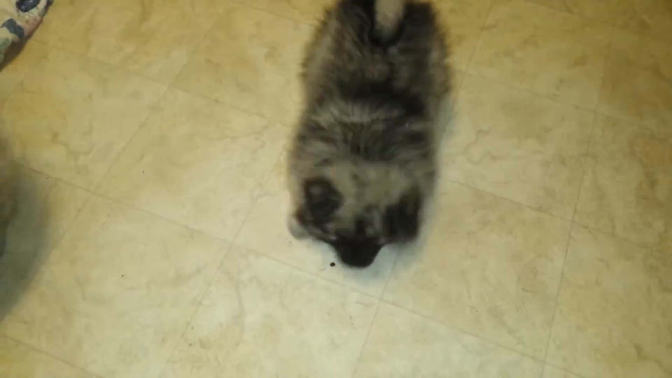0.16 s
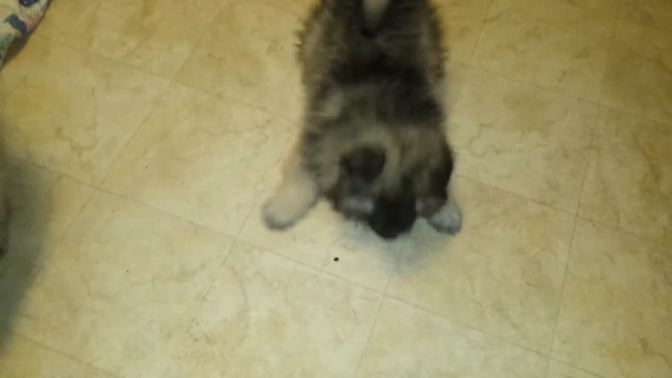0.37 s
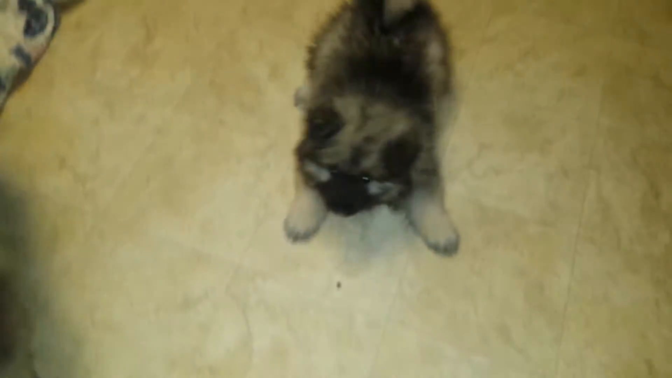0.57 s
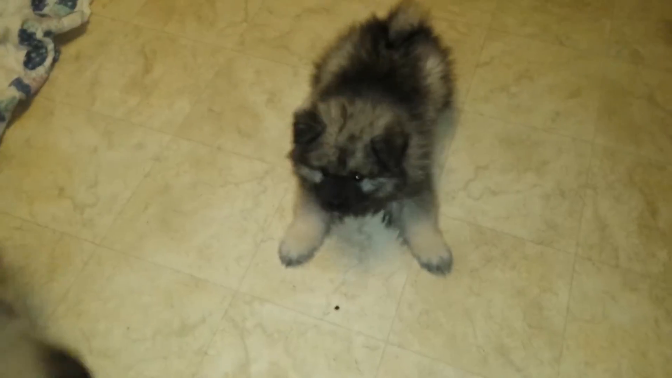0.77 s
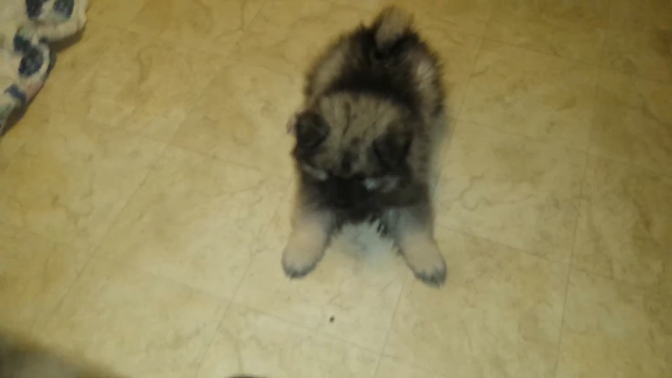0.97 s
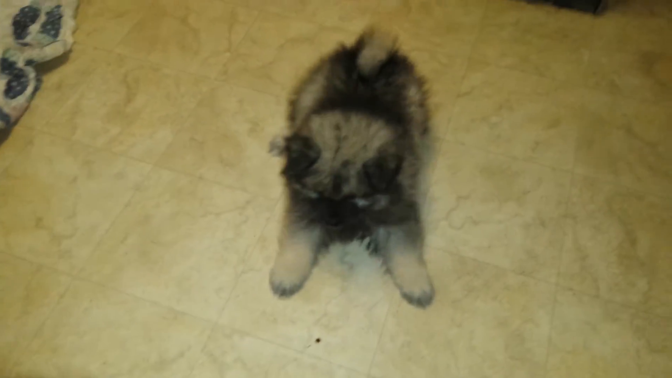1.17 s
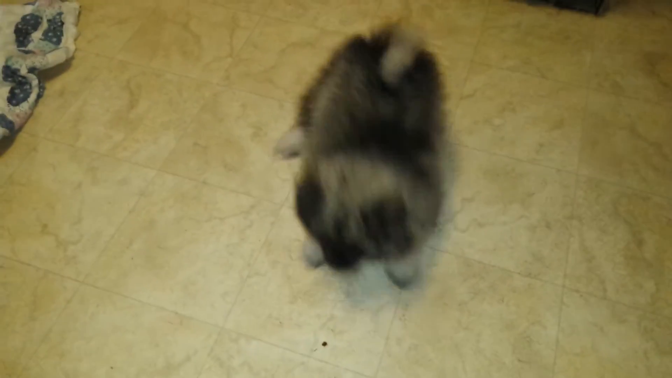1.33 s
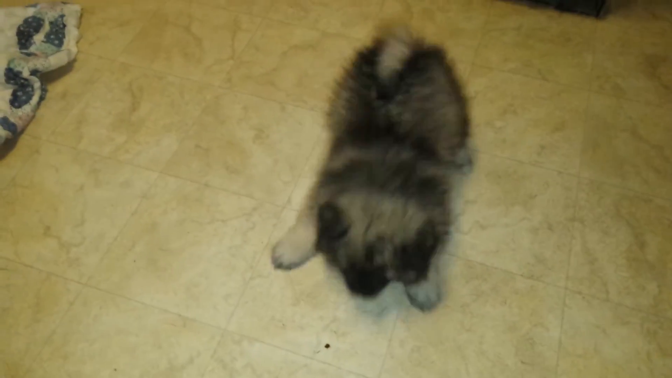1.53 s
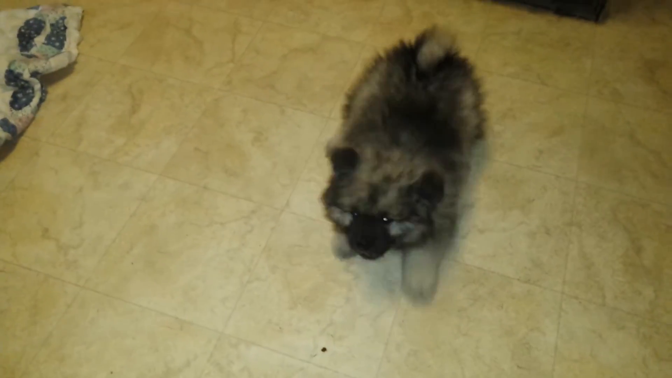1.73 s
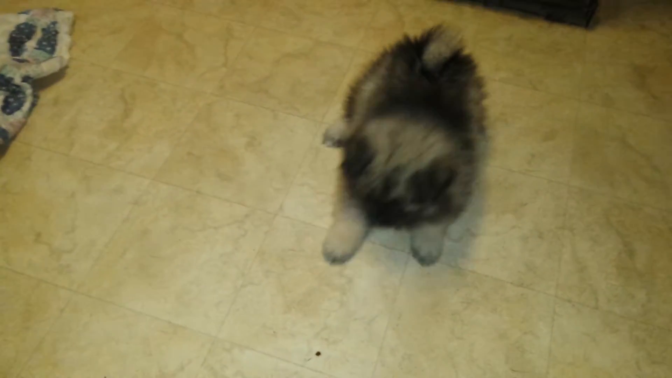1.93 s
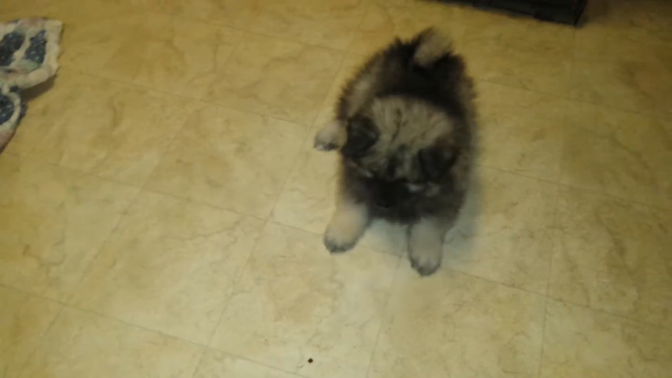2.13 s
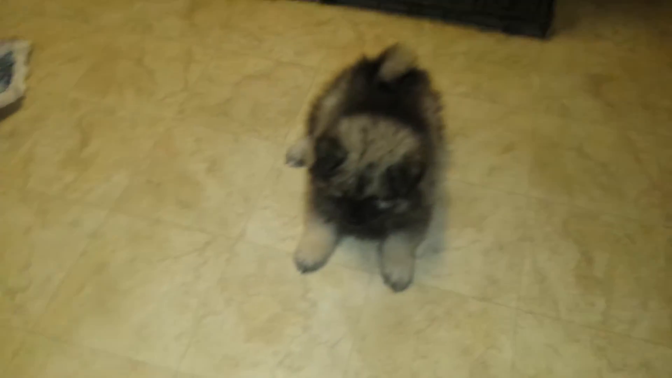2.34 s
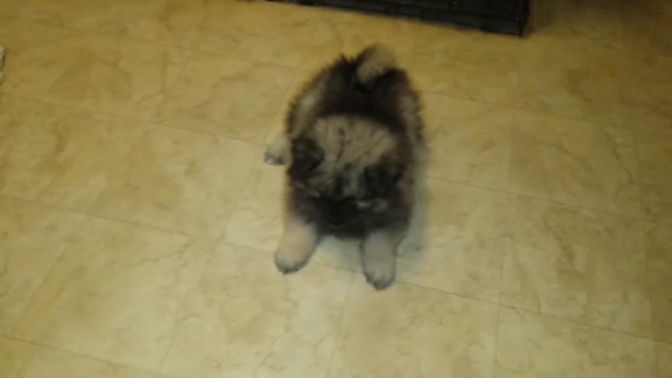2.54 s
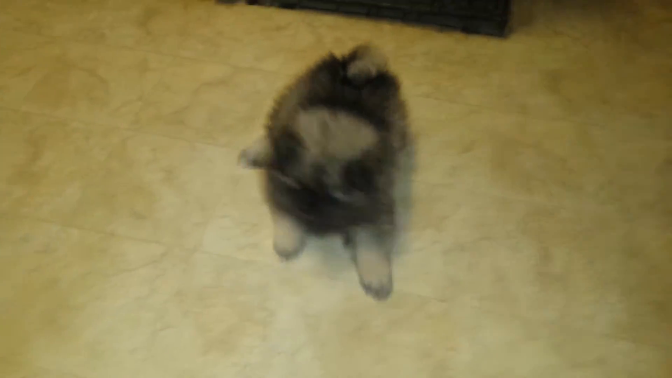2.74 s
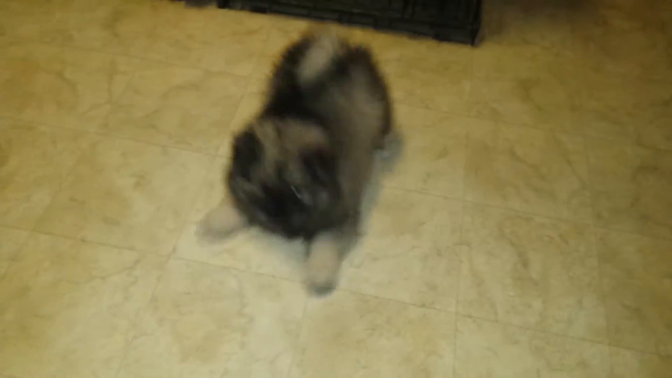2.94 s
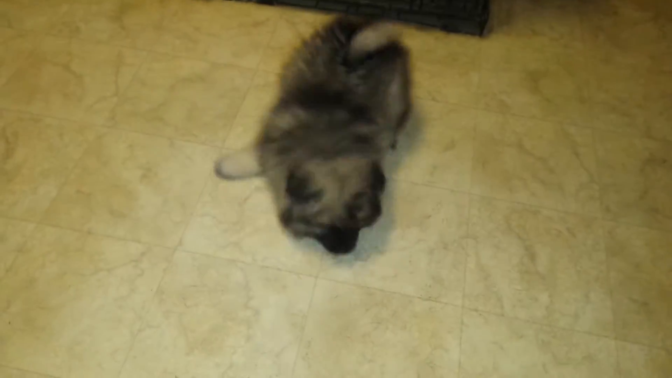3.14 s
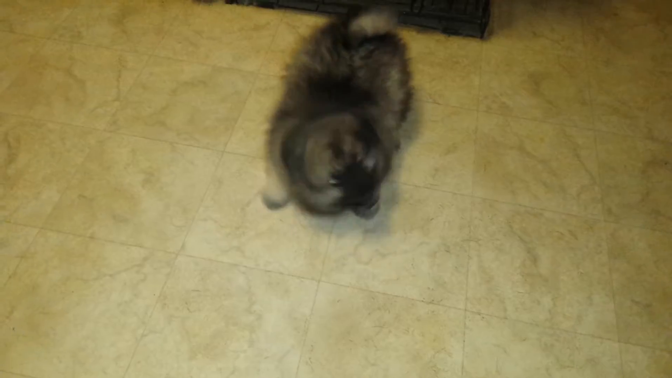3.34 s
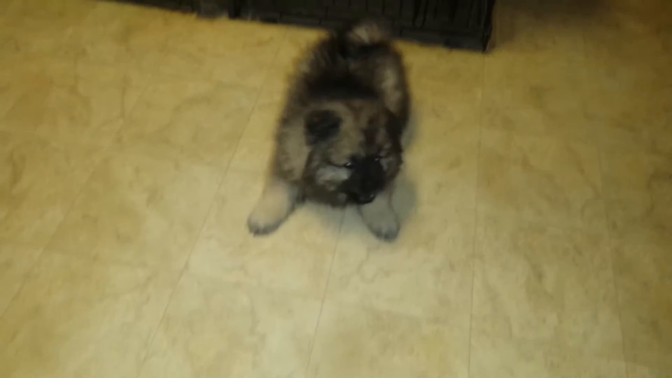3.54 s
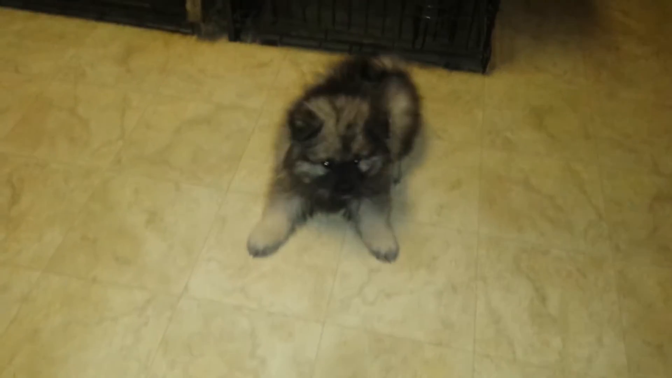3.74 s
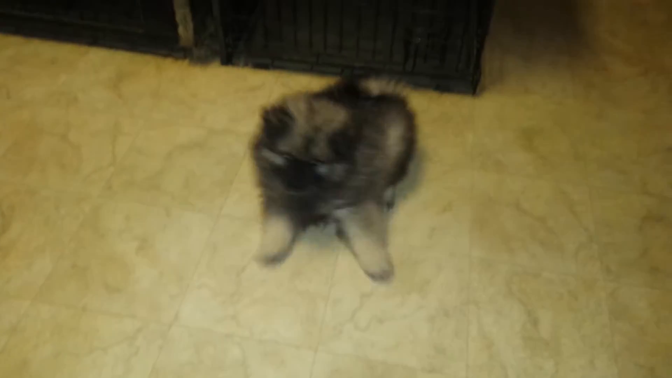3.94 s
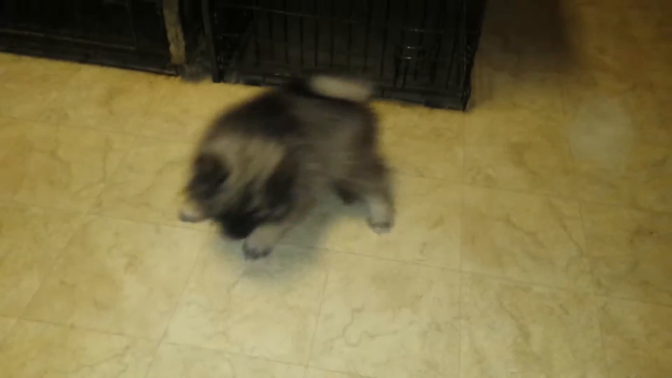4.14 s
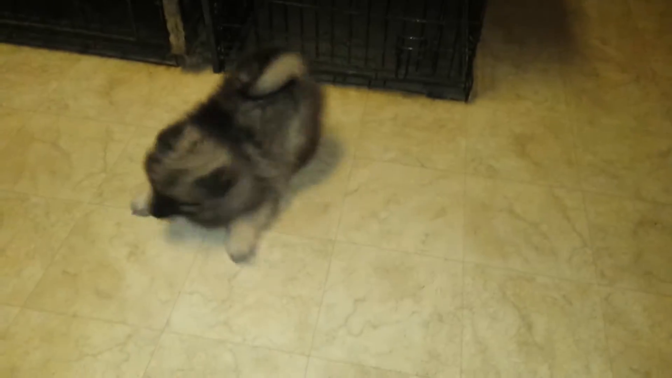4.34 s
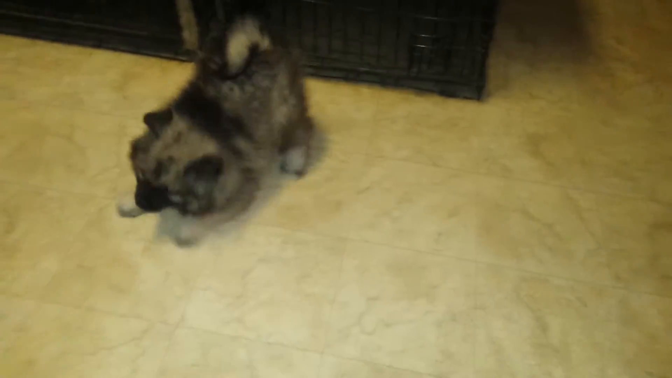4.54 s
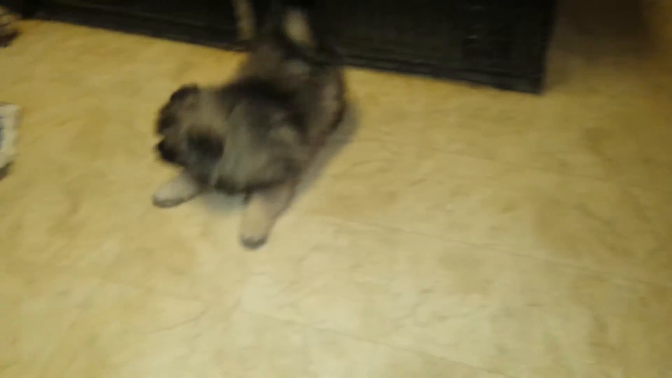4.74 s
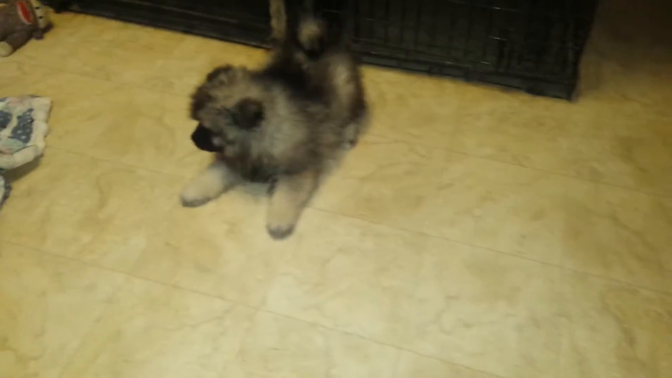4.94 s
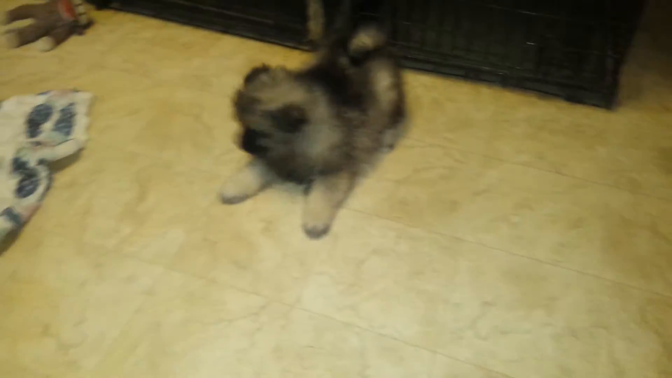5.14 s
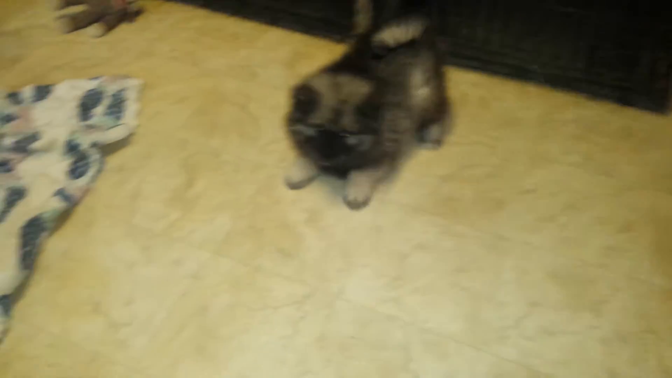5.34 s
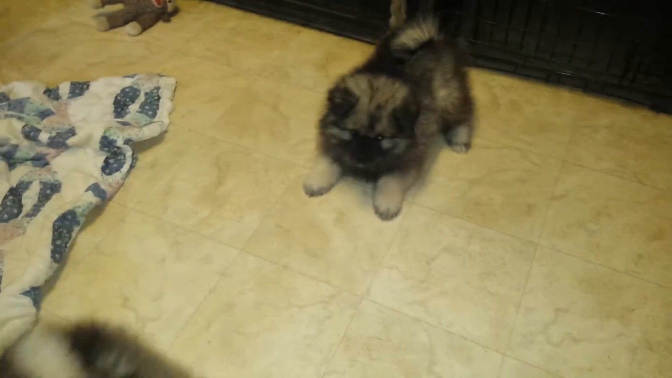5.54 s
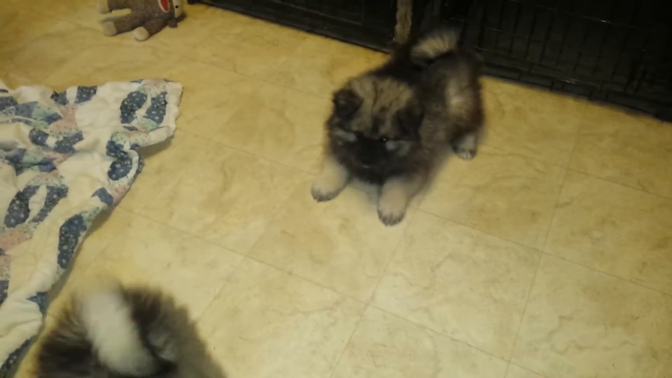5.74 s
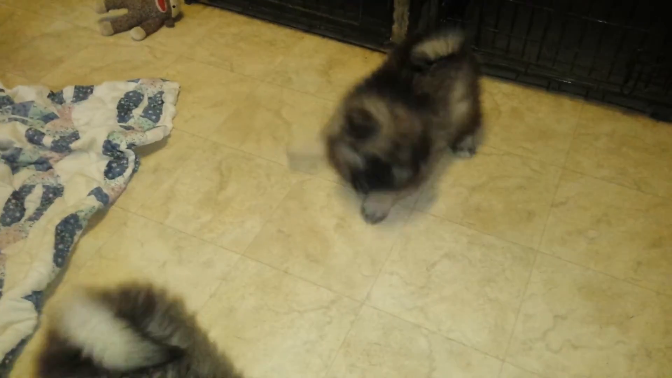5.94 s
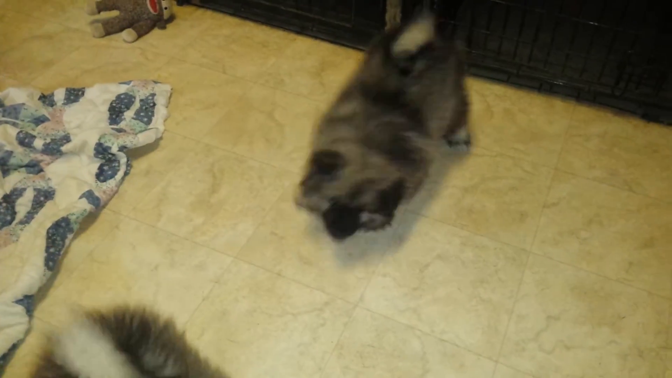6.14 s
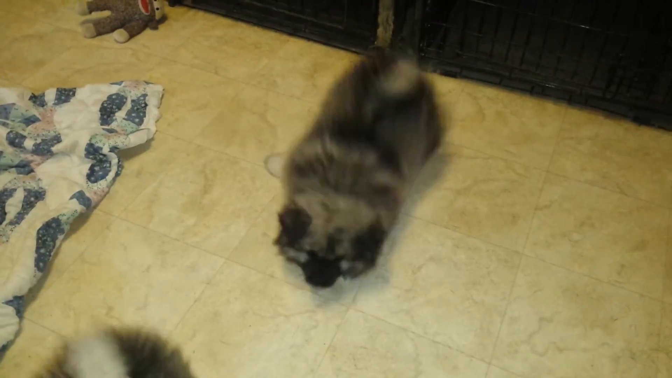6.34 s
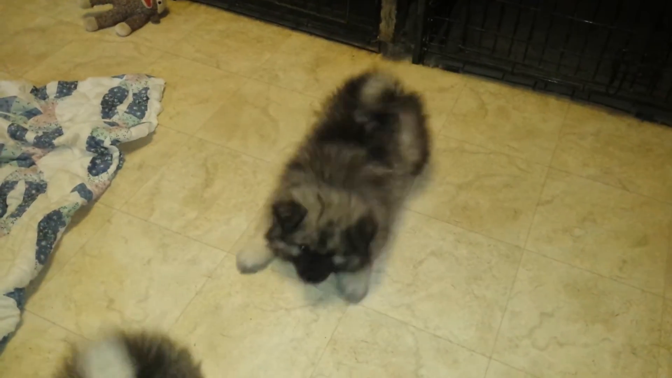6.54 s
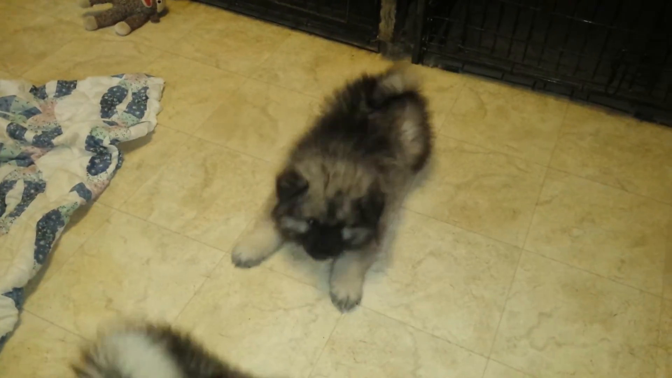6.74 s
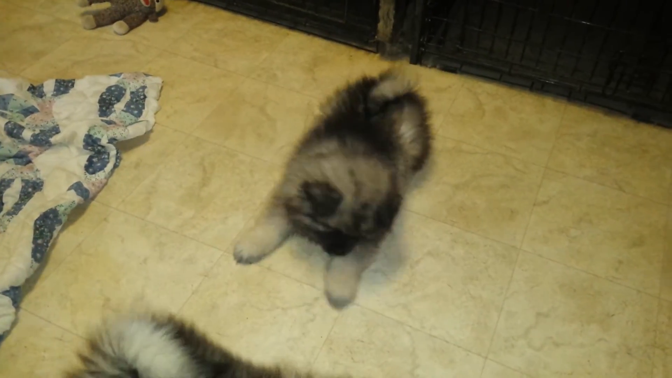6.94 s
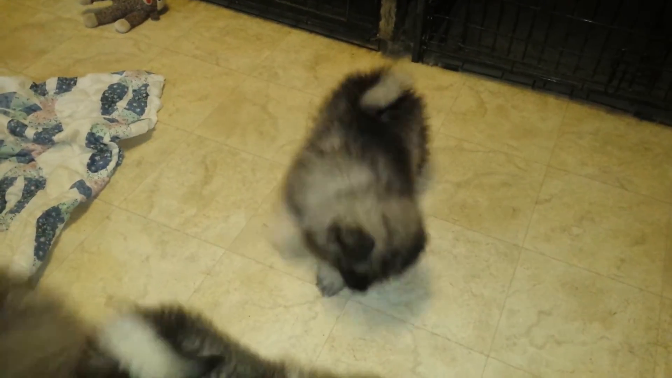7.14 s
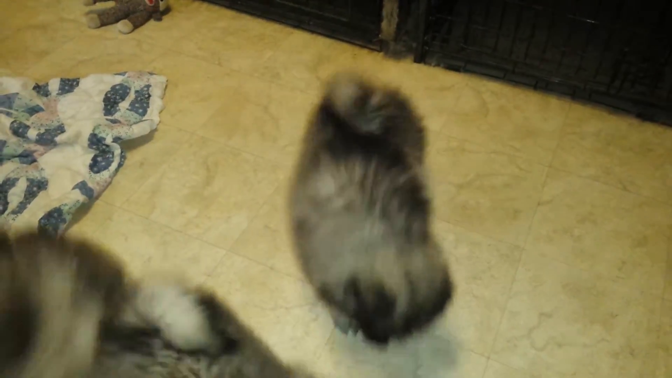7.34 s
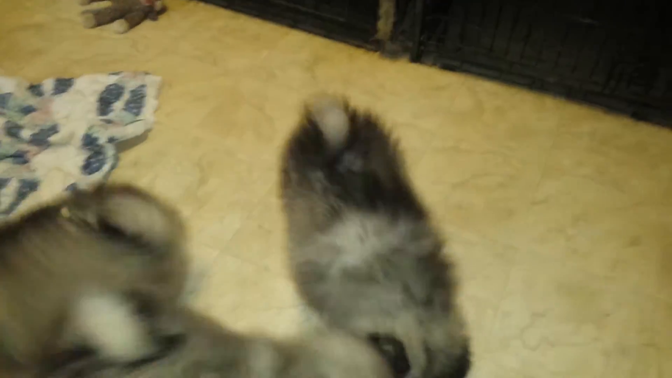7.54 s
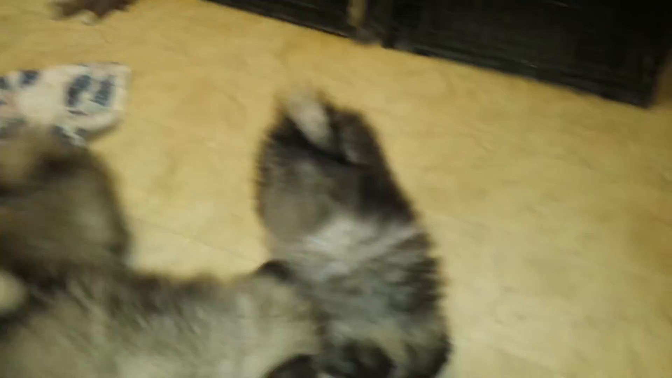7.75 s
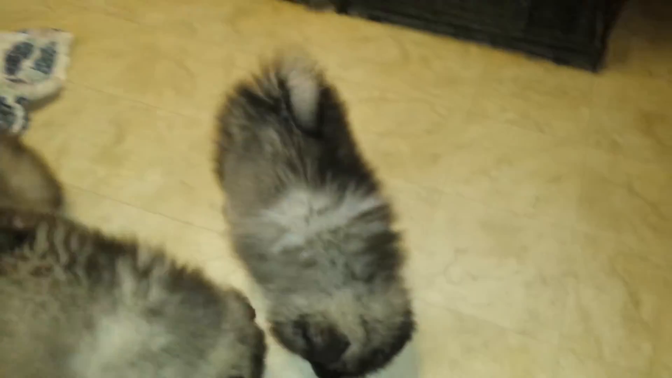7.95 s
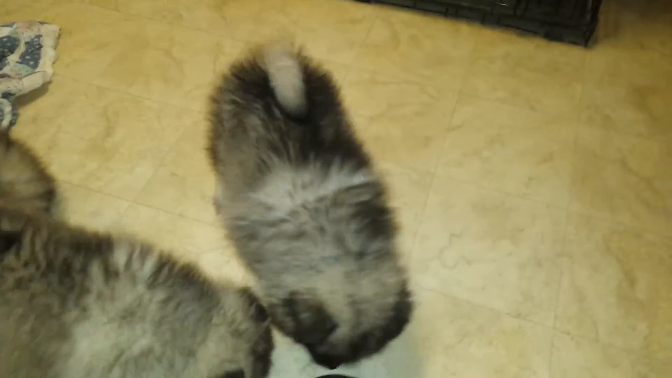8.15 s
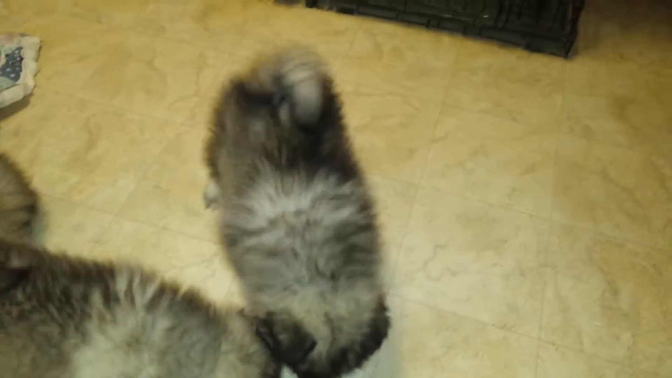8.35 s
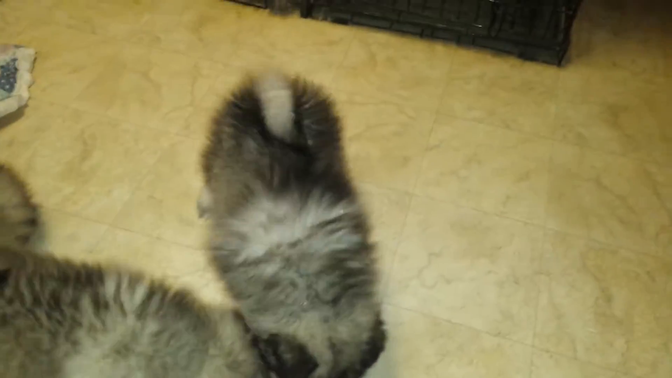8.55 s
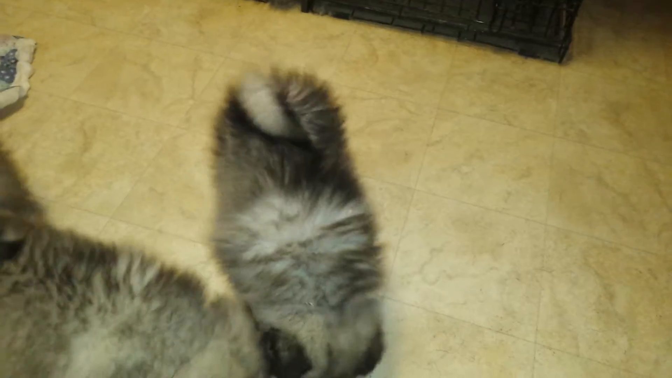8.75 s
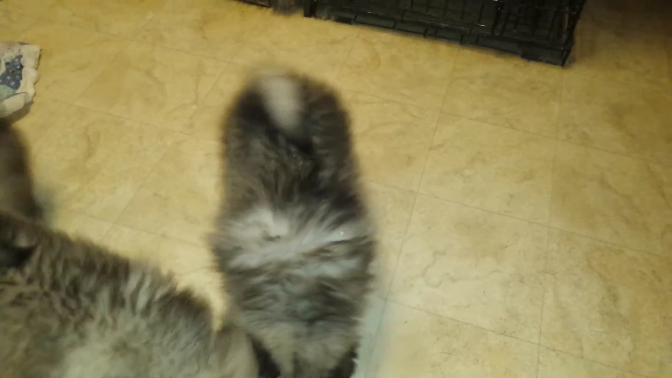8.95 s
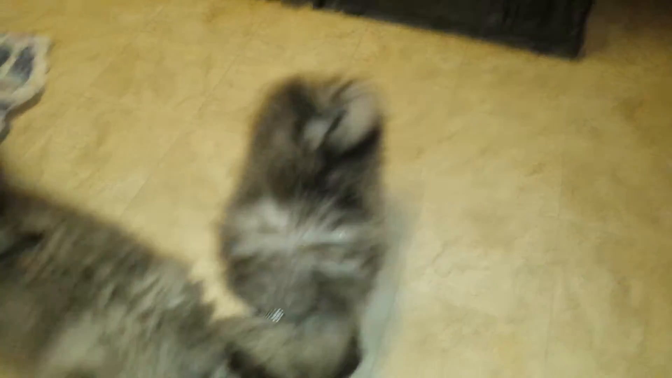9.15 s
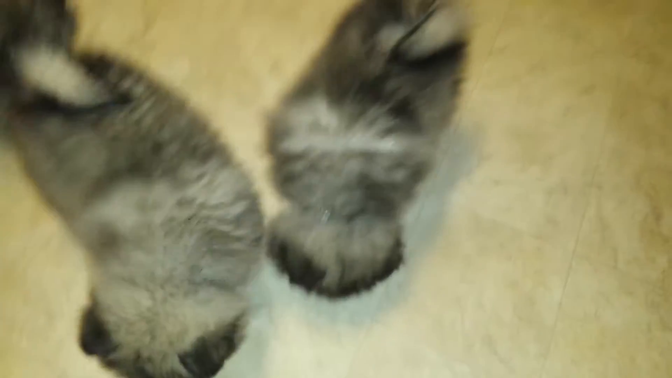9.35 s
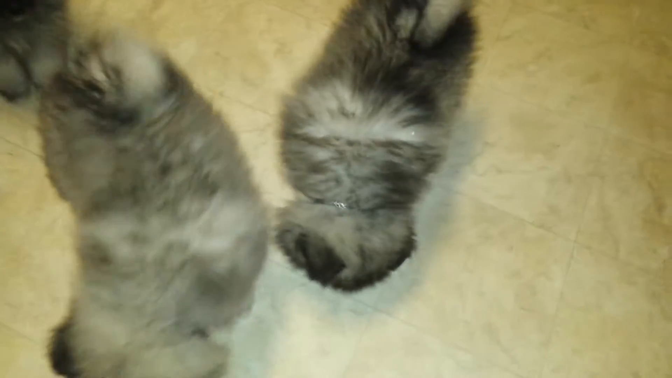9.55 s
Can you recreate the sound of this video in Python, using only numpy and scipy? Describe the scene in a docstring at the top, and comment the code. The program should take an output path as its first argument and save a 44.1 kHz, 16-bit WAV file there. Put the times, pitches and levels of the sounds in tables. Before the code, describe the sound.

A small puppy is heard from close above in a slightly echoey room, with a faint appliance hum throughout. Paws slide and pad on vinyl at the start as it gives three quick, high yaps within the first second, each arching in pitch with rough edges. Light claw ticks begin at about 1 second, and two more yaps follow around 1.5. After a pause there is a skid and three yaps between 3 and 3.7 seconds, then a single one at 4.6. Pads squeak faintly between 4.2 and 5.3 seconds, where the puppy makes one soft nasal grunt. Four yaps come from 6 to 7 seconds, the last one higher. After that there is no more barking, only claw clicks, soft paw thuds and scuffling, with a second puppy's fur brushing close by the microphones from about 8 seconds to the end at around 9.5.

```python
"""A live room with a vinyl floor, a small puppy close below a stereo pair of microphones. From the start an
appliance hums faintly and paws slide and pad. The puppy yaps thirteen times in seven seconds, each yap an
arch of pitch, rough at its ends and clearer on top, answered by the walls. Claws tick from one second in;
around the middle, pads squeak on the vinyl and the puppy grunts once through its nose. Towards the end a
second puppy brushes past close to the microphones."""
import sys
import numpy as np
from scipy import signal
from scipy.fft import rfft, irfft, next_fast_len
from scipy.io import wavfile
from scipy.ndimage import map_coordinates

SR = 44100
rng = np.random.default_rng(int(sys.argv[2]) if len(sys.argv) > 2 else 0)


def bounce(signal):
    """Save signal as a 16-bit WAV file at the path given by the first command-line argument."""
    frames = np.transpose(np.atleast_2d(signal))
    limited = np.clip(frames, -1, 1)
    pcm = np.round(limited * 32767).astype(np.int16)
    wavfile.write(sys.argv[1], SR, pcm)


N = 423360

# The hush of the room. Each row: frequency in Hz, noise density in dB.
HUSH_SPECTRUM = [(20, -17.5), (64, -11.5), (240, -1), (490, -15.5), (850, -13.5), (3300, -20), (6700, -22),
                 (12000, -44)]
# Movement on the floor. Each row: time in seconds, swish level in dB, relative padding level in dB.
SCUFFLE_LEVELS = [(0.0, -36.5, -39.5), (0.11, -34.5, -29), (0.19, -38.5, -39.5), (0.98, -58.5, -73.5),
                  (1.37, -64.5, -55.5), (2.05, -54, -78), (2.338, -55, -56), (3.04, -44.5, -42.5),
                  (3.88, -50, -74.5), (4.5, -47.5, -43.5), (5.0, -46.5, -51.5), (5.88, -58, -43.5),
                  (5.95, -49.5, -45.5), (7.05, -52.5, -68), (7.85, -43.5, -41), (8.22, -44.5, -38.5),
                  (8.5, -36, -35), (9.6, -42.5, -35)]
# Paws and fur skidding. Each row: time of the peak in seconds, half length in seconds, level in dB.
SKID_EVENTS = [(0.23, 0.011, -30.5), (2.98, 0.057, -34), (3.087, .02, -26.5), (4.661, .018, -34.5),
               (5.959, 0.029, -36), (6.002, 0.018, -28), (6.714, 0.011, -42), (7.232, .04, -44.5),
               (7.341, 0.048, -50), (7.852, 0.041, -43), (8.263, .008, -36), (8.576, 0.017, -37.5),
               (8.716, 0.034, -35.5), (9.117, .02, -33.5), (9.189, .03, -38), (9.45, 0.039, -41.5)]
# The hiss of sliding on vinyl. Each row: frequency in Hz, noise density in dB.
SWISH_SPECTRUM = [(800, -19.5), (1500, -13), (2500, -3), (3800, -12.5), (5500, -8), (6700, 2), (8400, -9.5),
                  (10000, -12), (12400, -25.5), (15500, -23)]
# The dull shuffle of pads. Each row: frequency in Hz, noise density in dB.
PADDING_SPECTRUM = [(15, -35.5), (40, -4), (80, -12.5), (125, 7.5), (170, -11.5), (230, 1), (450, -13),
                    (1000, -57)]
# The second puppy near the microphones. Each row: time in seconds, level in dB.
BRUSH_LEVELS = [(0, -43), (.9, -64.5), (7.4, -58), (7.9, -52.5), (8.55, -45), (9.6, -45.5)]
# Its rubbing coat. Each row: frequency in Hz, noise density in dB.
FUR_SPECTRUM = [(180, -27), (300, -7.5), (800, 2.5), (2500, -19), (4500, -61)]
# Paws landing. Each row: time in seconds, relative level in dB.
PAW_LANDINGS = [(0.047, -21.5), (2.615, -39.5), (2.741, -37.5), (2.996, -17), (7.556, -27.5), (7.848, -28),
                (8.447, -16.5), (8.928, -31)]
# The thud of a paw. Each row: frequency in Hz, noise density in dB.
THUD_SPECTRUM = [(25, -6.5), (70, -11.5), (130, -0.5), (250, 3.5), (450, -13.5), (1500, -25.5),
                 (5000, -59.5)]
# The yaps. Each row: start in seconds, rise in seconds, pitch in Hz at the start, top and end, time scale
# of the fall in seconds, relative level in dB, fade in dB per octave fallen, roughness from 0 to 1 at the
# start and top, low throat resonance in dB at the start, top and end, then, all in dB, halfway tones,
# edge near 3 kHz, treble, left minus right, room level.
YAP_EVENTS = [ (0.197, 0.085, 336.5, 771.3, 285, .096, -9, 18, 0.52, 0.22, 18, 7, 16, -31, 4.5, 5, -1, -3.5),
              (0.391, 0.085, 390.7, 795, 310, .092, -10.5, 15.5, 0.4, 0.034, 1, -8, 4, -21.5, -9, -1.5, -0.5, -6),
              (0.618, 0.097, 802.4, 1009, 462, .098, -10.5, 24, .2, 0.05, -2.5, 5, 15, -11, -5.5, 3.5, 0, -8.5),
              (1.433, 0.082, 443.8, 767.5, 331, 0.078, -15, 18, .55, 0.26, 15, 5, 8, -23, -2.5, 5.5, -4.5, -0.5),
              (1.701, 0.091, 398.3, 780, 320, .09, -8, 25, .45, 0.027, -8, -7, 3, -12.5, -2, -1, -.5, -6.5),
              (3.048, 0.083, 298.1, 787.6, 400, .093, -11, 17.5, 0.79, .13, 21.5, 9.5, 17, -32, 8.5, 5, -1.5, -3.5),
              (3.312, 0.093, 430.4, 794.7, 292, .09, -10, 20, .7, .2, -2.5, -5.5, 8, -18.5, -0.5, -2, 0.5, -5),
              (3.551, .069, 544.3, 762, 433, .102, -11.5, 27, .45, .18, -1, -0.5, 9, -14.5, 0, -0.5, 1, -4),
              (4.641, .093, 387, 757, 425, .09, -13.5, 22, .55, 0.06, 11, -5.5, 10, -32, 0.5, 3.5, -1.5, 2),
              (5.968, 0.092, 350.3, 759.3, 341, .082, -8, 23, .85, 0.052, -1.5, -4, 6, -32, -5, 0, 0, -3.5),
              (6.133, 0.1, 444.8, 789, 301, .11, -12, 16, 0.4, 0.093, 17, 8, 8.7, -40.5, 8, 11, -2.5, -6),
              (6.351, .095, 436.8, 742, 465, .071, -10.5, 11.5, .18, .06, 10, 0.5, 24, -45, -3.5, 3, -2, -5),
              (6.69, .082, 738, 1077, 387, .088, -14.5, 10, .3, 0.44, 3.5, 0, 6.7, -4, 10, 9.5, 2, -4.5), ]
# Resonances of throat and muzzle. Each row: frequency in Hz, gain in dB.
THROAT_RESPONSE = [(200, -20.5), (400, -6), (750, -14.5), (1050, 5.5), (1500, -5), (1750, 3.5), (2250, 7),
                   (2600, -4.5), (3100, -11), (3500, -29.5), (4200, -30), (5100, -13.5), (6200, -30.5),
                   (7300, -28.5), (8600, -40.5), (10500, -28.5), (11800, -53.5), (15000, -40.5)]
# Turbulent air in the open mouth. Each row: frequency in Hz, noise density in dB.
BREATH_SPECTRUM = [(200, -37.5), (500, -21), (1150, 4), (1700, -21), (2350, 8.5), (3100, -1.5), (3800, -17),
                   (5200, -24), (6300, -25), (7400, -16.5), (8600, -24.5), (10400, -22), (15000, -34.5)]
# The ring of the room. Each row: frequency in Hz, time to die away by 60 dB in seconds.
ROOM_DECAY = [(200, 0.27), (800, 0.47), (2100, 0.38), (5500, 0.55), (14000, 0.2)]
# Claws striking. Each row: time in seconds, relative tick level in dB, level of the floor's tap in dB.
CLAW_STRIKES = [(1.0045, -36.5, -40.5), (1.1128, -29.5, -50), (1.2812, -30.5, -57.5), (2.6165, -57, -32),
                (2.9172, -41, -26.5), (3.9283, -24.5, -57), (4.1539, -36, -57), (4.1774, -22.5, -46.5),
                (4.372, -27, -49.5), (5.006, -26, -36.5), (5.1708, -26.5, -47.5), (5.624, -33.5, -46.5),
                (7.357, -18, -56), (7.8354, -40.5, -32.5), (8.2533, -13, -39), (8.291, -24.5, -46),
                (8.4362, -15.5, -30), (8.799, -14.5, -33.5), (8.8947, -19, -29.5), (9.239, -19, -44.5)]
# The claw's tick and the floor's tap. Each row: frequency in Hz, noise density in dB.
TICK_SPECTRUM = [(1500, -11), (2700, 16), (4000, -6.5), (7000, 22), (15000, -19.5)]
TAP_SPECTRUM = [(200, -2), (800, 0.5), (2400, -8.0), (4000, -36.0)]
# Pads squeaking on vinyl. Each row: time of the peak in seconds, pitch in Hz, level in dB.
PAD_SQUEAKS = [(4.199, 2490, -42.5), (4.245, 2590, -47.5), (4.459, 2560, -47), (5.325, 2355, -41)]
# The course of the grunt. Each row: time in seconds, pitch in Hz, level in dB.
GRUNT_CONTOUR = [(5.267, 224.5, -41), (5.278, 243, -31.5), (5.324, 194.7, -42)]
# Resonances of the nose. Each row: frequency in Hz, gain in dB.
NOSE_RESPONSE = [(120, -8.5), (240, 2.5), (480, 0.5), (1200, -13), (1750, 0.5), (2600, -10.5), (3700, -17),
                 (15000, -16)]
# The unequal colour of the two microphones. Each row: frequency in Hz, left minus right in dB.
MIC_BALANCE = [(500, 2), (1200, 3), (5000, 1), (9000, -1.5), (14000, -11.5)]

TOP_HZ = 15800
ATTACK_S, ATTACK_DB = 0.022, 12.5  # the level leaps as the folds burst open
SWELL_DB_PER_OCT = 8  # the level climbs with the pitch
CLEAR_SHARE, BREAK_SHARE = 0.2, 0.48  # shares of the rise: clear below the top, strain easing before that
JAW_CLOSE_OCT, END_ROUGH = 0.62, 0.48  # fall over which the slack end takes over, and its roughness


def amp(db):
    """Decibels to gain."""
    return 10 ** (np.asarray(db) / 20)


def unit(x):
    """Scale to rms 1."""
    return x / np.sqrt(np.mean(x ** 2) + 1e-20)


def along(points, hz):
    """Read (Hz, value) points on a log frequency axis."""
    knots_hz, values = np.transpose(points)
    return np.interp(np.log(hz + 1), np.log(knots_hz + 1), values)


def curves(rows, t):
    """Each column after the time, read at the times t."""
    times, *columns = np.transpose(rows)
    return [np.interp(t, times, column) for column in columns]


def wobble(rate, size):
    """A smooth random curve with rate knots a second."""
    knots = rng.standard_normal(int(size * rate / SR) + 4)
    return map_coordinates(knots, [np.arange(size) * rate / SR], mode="nearest")


def filtered(x, response):
    """Filter x by a gain given as a function of Hz."""
    n = x.shape[-1]
    padded = next_fast_len(n + 8192)
    return irfft(rfft(x, padded) * response(np.fft.rfftfreq(padded, 1 / SR)), padded)[..., :n]


def noise(spectrum, size):
    """Coloured noise of rms 1."""
    return unit(filtered(rng.standard_normal(size), lambda hz: amp(along(spectrum, hz))))


def spread(hz):
    """Mid and side gains of diffuse sound at two closely spaced microphones: the bass is nearly mono."""
    alike = .97 * np.sinc(hz / 1700)
    return np.sqrt([(1 + alike) / 2, (1 - alike) / 2])


def diffuse(spectrum, size):
    """Stereo noise whose mid has rms 1."""
    white = rng.standard_normal((2, size))
    mid, side = filtered(white, lambda hz: amp(along(spectrum, hz)) * spread(hz))
    return np.array([mid + side, mid - side]) / np.std(mid)


def add(track, start_s, sound):
    """Mix a sound into a track."""
    part = track[..., max(round(start_s * SR), 0):][..., :sound.shape[-1]]
    part += sound[..., :part.shape[-1]]


def room(x, gap_s=0.0024):
    """The walls' answer at the microphones: a decaying tail, new for each place the puppy stands."""
    hz, t, bins = signal.stft(rng.standard_normal((2, SR // 2)), SR, nperseg=256)
    decay = amp(-60 * t / along(ROOM_DECAY, hz)[:, None])
    mid, side = signal.istft(bins * spread(hz)[:, :, None] * decay, SR, nperseg=256)[1]
    onset = np.clip(np.arange(len(mid)) / SR / gap_s - 1, 0, 1)
    tail = np.array([mid + side, mid - side]) * onset
    return signal.fftconvolve(x[None], tail / np.linalg.norm(tail[0]), axes=1)


def room_tone(hum_hz=126, hum_db=-60, hush_db=-58):
    """An appliance's wavering low hum over the hush of the room."""
    t = np.arange(N) / SR
    waver = 0.67 + wobble(2.8, N) + 1j * wobble(30, N)
    hum = unit(np.real(waver * np.exp(2j * np.pi * hum_hz * t)))
    return amp(hum_db) * hum + amp(hush_db) * diffuse(HUSH_SPECTRUM, N)


def scuffling(grain_db=1.5):
    """Paws and fur slide over the vinyl in tiny catches, over a dull shuffle and the brush of a coat."""
    t = np.arange(N) / SR
    slide_db, pad_db = curves(SCUFFLE_LEVELS, t)
    stroke = wobble(28, N)
    skids = sum(amp(db) * np.exp(-((t - peak_s) / half_s) ** 2) for peak_s, half_s, db in SKID_EVENTS)
    slide = amp(slide_db + 1.8 * stroke) + skids
    catches = 1 + 0.18 * np.maximum(wobble(160, N) - 1, 0) ** 2  # now and then a claw snags
    swish = slide * catches * amp(grain_db * wobble(700, N)) * diffuse(SWISH_SPECTRUM, N)
    pads = amp(pad_db - 5.5 + 1.3 * wobble(22, N)) * diffuse(PADDING_SPECTRUM, N)
    return swish * amp([[-.5], [.3]]) + pads + fur_brush(t, stroke)


def fur_brush(t, stroke):
    """The second puppy's coat rubs by at close range, briefly at the start and again towards the end."""
    brush_db, = curves(BRUSH_LEVELS, t)
    return amp(brush_db + 0.42 * stroke + 0.78 * wobble(150, N)) * diffuse(FUR_SPECTRUM, N)


def paw_thuds(t60_s=0.28, rise_s=0.0074):
    """Soft pads land on the floor with a low thud."""
    out, t = np.zeros((2, N)), np.arange(SR // 5) / SR
    for time_s, db in PAW_LANDINGS:
        envelope = amp(db - 8 - 60 * t / t60_s) * (1 - np.exp(-t / rise_s))
        add(out, time_s - .004, envelope * diffuse(THUD_SPECTRUM, len(t)))
    return out


def pitch_arch(rise_s, start_hz, top_hz, end_hz, fall_s, fade_db_per_oct):
    """One push of effort: the pitch climbs a bell curve and slides down another until the voice stops."""
    t = np.arange(0, rise_s + fall_s * np.sqrt(np.log(top_hz / end_hz)), 1 / SR)
    rise_left = np.clip(1 - t / rise_s, 0, 1)
    below_oct = np.log2(top_hz / start_hz) * rise_left ** 2
    fallen_oct = (np.maximum(t - rise_s, 0) / fall_s) ** 2 / np.log(2)
    pitch = top_hz / 2 ** (below_oct + fallen_oct)
    attack_left = np.clip(1 - t / ATTACK_S, 0, 1)
    shape_db = -ATTACK_DB * attack_left - SWELL_DB_PER_OCT * below_oct - fade_db_per_oct * fallen_oct
    return t, pitch, shape_db, rise_left, fallen_oct


def low_band(hz):
    """Weight of the low throat resonance, with a skirt that reaches down to the bass."""
    return np.clip((1950 - hz) / 400, 0, 1) * np.clip((hz - 600) / 300, 0.54, 1)


def edge_band(hz):
    """Weight of the voice's edge near 3 kHz."""
    return np.exp(-((hz - 3050) / 450) ** 2)


def high_band(hz):
    """Weight of the voice's treble."""
    return np.clip((hz - 3200) / 1000, 0, 1)


def vocal_folds(t, pitch, phase, rough, halves, bands, chest_db=15, closing_db=-7, sub_db=-11):
    """Harmonics and the tones halfway between them sweep through the throat; gives sound and power."""
    # the jaw closes as the pitch falls: the fundamental takes over and the top dims
    closed = np.clip((700 - pitch) / 250, 0, 1) * np.clip((t - t.mean()) / 0.03, .35, 1)
    n = len(t)
    voiced, power = np.zeros(n), np.zeros(n)
    for k in range(1, 44):  # even k are harmonics, odd k halfway tones
        hz = k / 2 * pitch
        high = high_band(hz)
        mouth_db = sum(db * band(hz) for band, db in bands) + sub_db * (k == 1)
        jaw_db = closed * (chest_db if k == 2 else closing_db * high)
        drift_db = 2.8 * wobble(50.8, n)
        gain = amp(along(THROAT_RESPONSE, hz) + mouth_db + jaw_db + drift_db)
        gain *= (halves if k % 2 else 1) * (hz < TOP_HZ)
        # high overtones are ragged even in a clear yap; the throat shifts the phase of each
        ragged = rough * (1 + 2 * high) + .7 * np.clip((hz - 3000) / 9000, 0, 1)
        smear = ragged * (wobble(329.6, n) + 1j * wobble(329.2, n))
        gain /= np.hypot(1, ragged * high)
        voiced += gain * np.real((1 + smear) * np.exp(1j * (k / 2 * phase + rng.uniform(0, 2 * np.pi))))
        power += gain ** 2 * (1 / 2 + ragged ** 2)
    return voiced, power


def breath(phase, bands):
    """Turbulent air escapes through the mouth in a puff at each opening of the folds."""
    air = noise(BREATH_SPECTRUM, len(phase))
    air = air + sum(filtered(air, band) * (amp(db) - 1) for band, db in bands)
    return unit(air * (1 + 0.29 * np.cos(phase)))


def yap(rise_s, start_hz, top_hz, end_hz, fall_s, level_db, fade_db_per_oct, start_rough, top_rough,
        start_low_db, top_low_db, end_low_db, halves_db, edge_db, bright_db,
        jitter=0.046, shimmer_db=1.5, chaos_db=-15, hoarse_db=-33, resonance_lift=0.14):
    """Folds and breath pass from a strained, noisy start over a clearer top to a slack, rough end."""
    t, pitch, shape_db, rise_left, fallen_oct = pitch_arch(
        rise_s, start_hz, top_hz, end_hz, fall_s, fade_db_per_oct)
    n = len(t)
    strain = np.clip((rise_left - CLEAR_SHARE) / BREAK_SHARE, 0, 1)
    slack = np.clip(fallen_oct / JAW_CLOSE_OCT, 0, 1)
    blend = lambda start, top, end: top + (start - top) * strain + (end - top) * slack
    rough = np.clip(blend(start_rough, top_rough, END_ROUGH), .03, .95)
    low_db = blend(start_low_db, top_low_db, end_low_db)
    treble_db = bright_db + strain  # full strain adds 1 dB of bite
    bands = [(low_band, low_db), (edge_band, edge_db), (high_band, treble_db)]
    envelope = amp(level_db + shape_db + shimmer_db * wobble(58.4, n))
    pitch = pitch * (1 + jitter * rough * wobble(421.3, n) + 0.006 * wobble(90, n))
    phase = 2 * np.pi * np.cumsum(pitch) / SR
    # on the way up the folds may beat strong-weak, adding tones halfway between the harmonics
    halves = amp(chaos_db) * rough + amp(halves_db) * np.clip(rise_left / 0.05, 0, 1)
    voiced, power = vocal_folds(t, pitch, phase, rough, halves, bands)
    air = breath(phase, bands)
    air_share = rough ** 1.39
    voice = np.sqrt(1 - air_share ** 2) * voiced / np.sqrt(power) + air_share * air
    # the voice swells as a harmonic meets a resonance
    top_power = np.mean(power[strain + slack < .1])
    swell = (power / top_power) ** (resonance_lift / 2)
    hoarse_hiss = amp(hoarse_db + treble_db) * unit(filtered(air, high_band))
    fade = np.clip(np.minimum(t, t[-1] - t) / 0.011, 0, 1)
    return fade * envelope * (swell * voice + hoarse_hiss)


def barking(direct_db=-3.0, lag_s=.000028, beam_db=-4):
    """Each yap arrives straight from the muzzle, at the right microphone first, then from the walls."""
    out = np.zeros((2, N))
    for start_s, *voice, pan_db, room_db in YAP_EVENTS:
        direct = yap(*voice)
        delayed = filtered(direct, lambda hz: np.exp(-2j * np.pi * hz * lag_s))
        add(out[0], start_s, delayed * amp(direct_db + pan_db / 2))
        add(out[1], start_s, direct * amp(direct_db - pan_db / 2))
        # the muzzle beams its treble forward, so less of it reaches the walls
        stray = filtered(direct, lambda hz: amp(room_db + along([(3000, 0), (5000, beam_db)], hz)))
        add(out, start_s, room(stray))
    return out


def claw_ticks(tick_t60_s=.02, tap_t60_s=.04, room_db=-5):
    """Hard claws tick and the floor answers with a tap, a little right of centre."""
    out, t = np.zeros((2, N)), np.arange(SR // 5) / SR
    for time_s, tick_db, tap_db in CLAW_STRIKES:
        tick = amp(tick_db - 10 - 60 * t / tick_t60_s) * noise(TICK_SPECTRUM, len(t))
        tap = amp(tap_db - 60 * t / tap_t60_s) * noise(TAP_SPECTRUM, len(t))
        add(out, time_s, (tick + tap) * amp([[-1], [1]]))
        add(out, time_s, amp(room_db) * room(tick + tap))
    return out


def pad_squeaks(half_s=0.017, waver=0.057, room_db=0.5):
    """A pad sticks and slips on the vinyl for a moment: a short, wavering chirp."""
    out, t = np.zeros((2, N)), np.arange(-SR // 20, SR // 20) / SR
    for peak_s, hz, db in PAD_SQUEAKS:
        phase = 2 * np.pi * np.cumsum(hz * (1 + waver * wobble(500, len(t)))) / SR
        chirp = amp(db) * np.exp(-(t / half_s) ** 2) * np.sin(phase)
        add(out, peak_s + t[0], chirp)
        add(out, peak_s + t[0], amp(room_db) * room(chirp))
    return out


def grunt(jitter=.035, puff=.55, room_db=-7):
    """With the mouth closed, a short low buzz and a puff of air leave through the nose."""
    out, t = np.zeros((2, N)), np.arange(GRUNT_CONTOUR[0][0], GRUNT_CONTOUR[-1][0], 1 / SR)
    pitch, db = curves(GRUNT_CONTOUR, t)
    phase = 2 * np.pi * np.cumsum(pitch * (1 + jitter * wobble(200, len(t)))) / SR
    buzz = unit(sum(amp(along(NOSE_RESPONSE, k * pitch)) * np.cos(k * phase) for k in range(1, 30)))
    direct = amp(db) * (buzz + puff * noise(NOSE_RESPONSE, len(t)))
    add(out, t[0], direct)
    add(out, t[0], amp(room_db) * room(direct))
    return out


def scene():
    """Voice, feet and room as they reach the microphones."""
    return barking() + grunt() + claw_ticks() + paw_thuds() + pad_squeaks() + scuffling() + room_tone()


def record(dry):
    """The stereo pair: each microphone's colour, a soft ceiling on the loudest peaks, a band limit."""
    coloured = filtered(dry, lambda hz: amp(along(MIC_BALANCE, hz) * np.array([[.5], [-.5]])))
    limited = coloured / (1 + np.abs(coloured) ** 8) ** (1 / 8)
    return filtered(limited, lambda hz: hz < TOP_HZ)


dry = scene()
out = record(dry)
bounce(out)
```